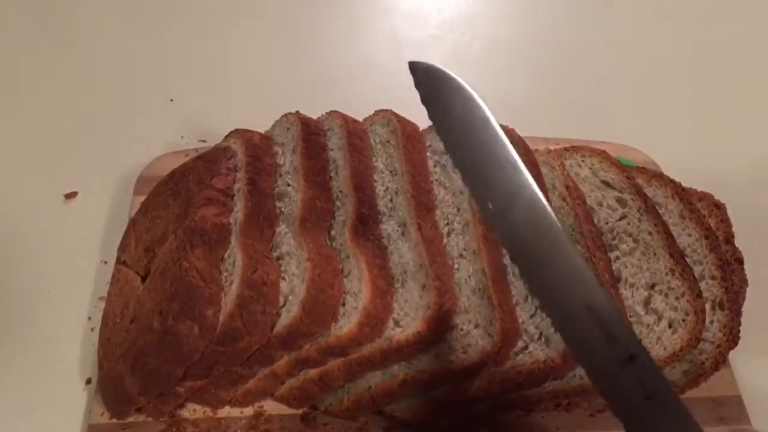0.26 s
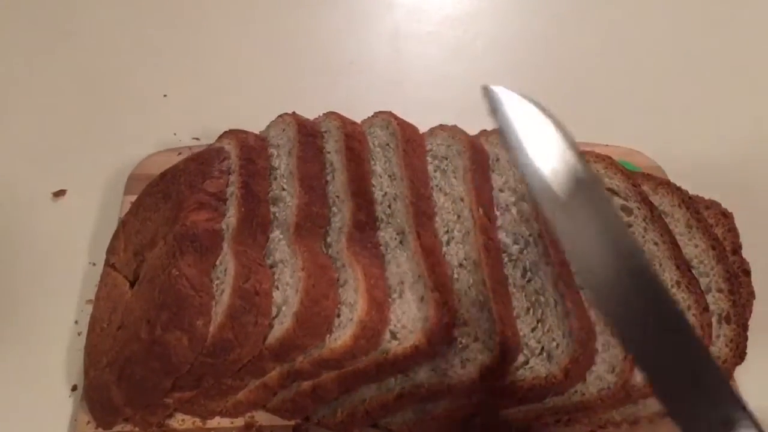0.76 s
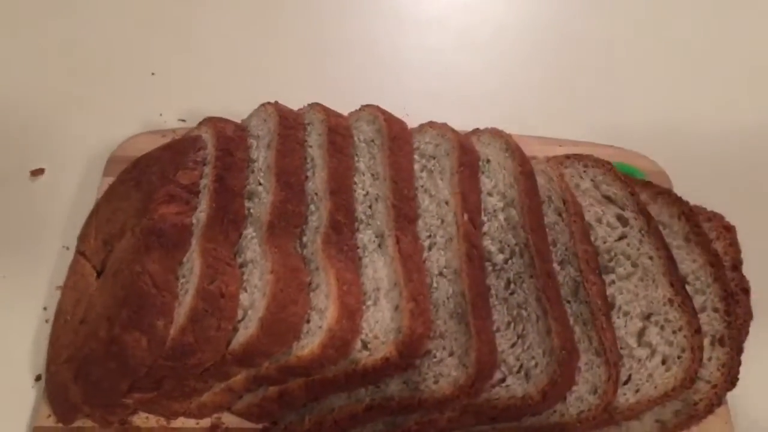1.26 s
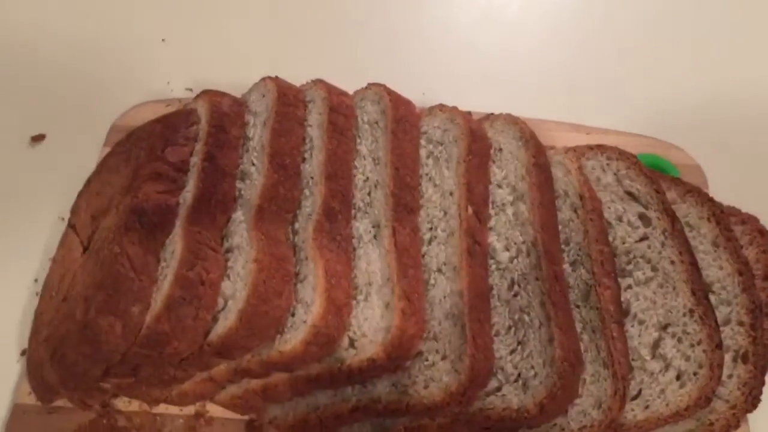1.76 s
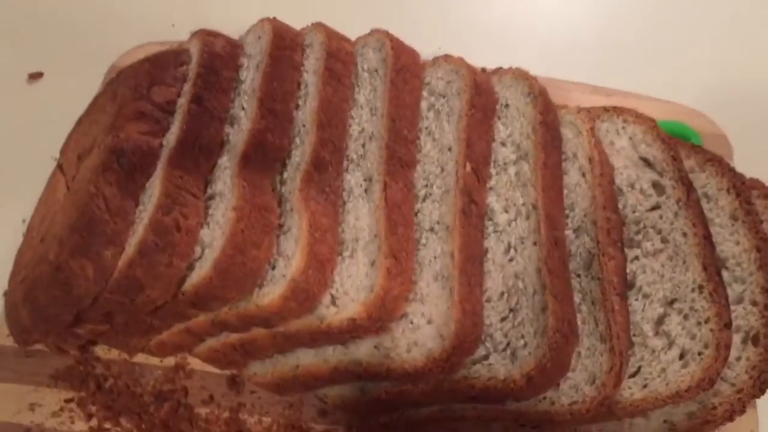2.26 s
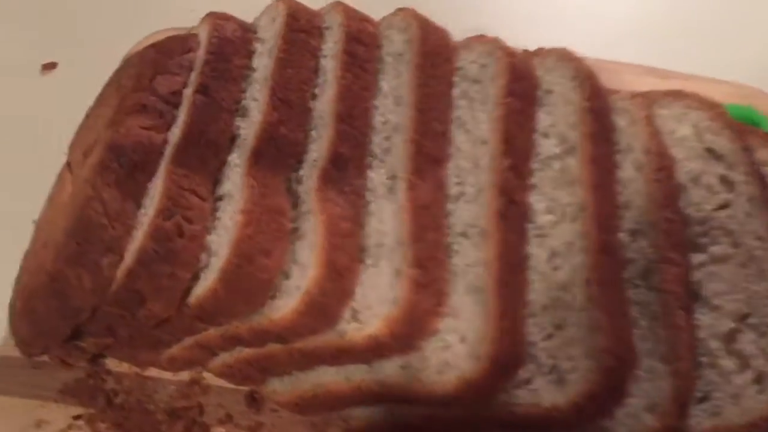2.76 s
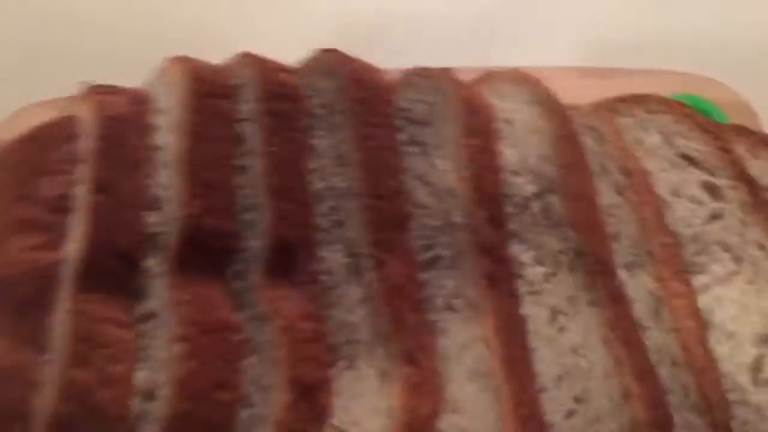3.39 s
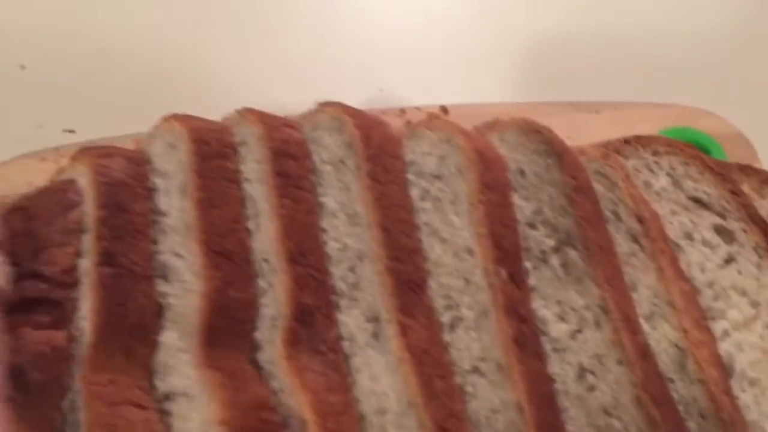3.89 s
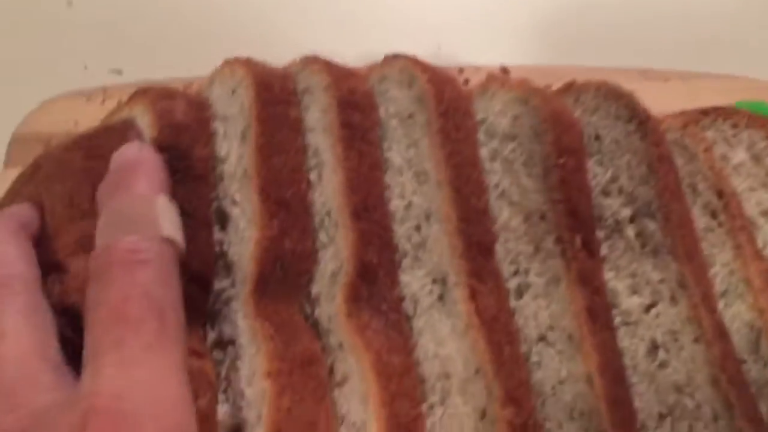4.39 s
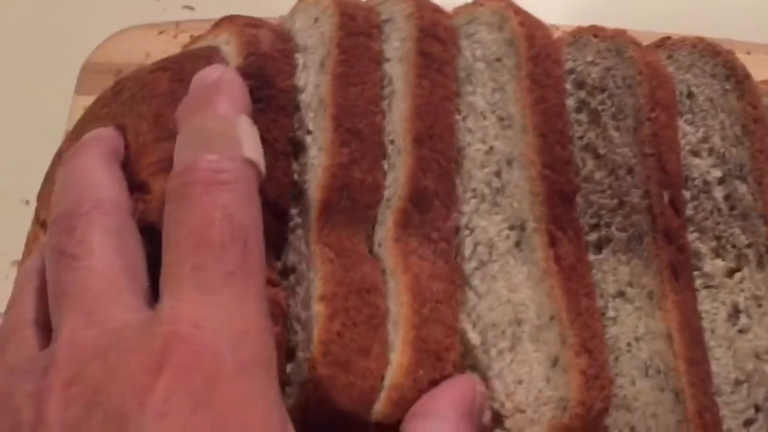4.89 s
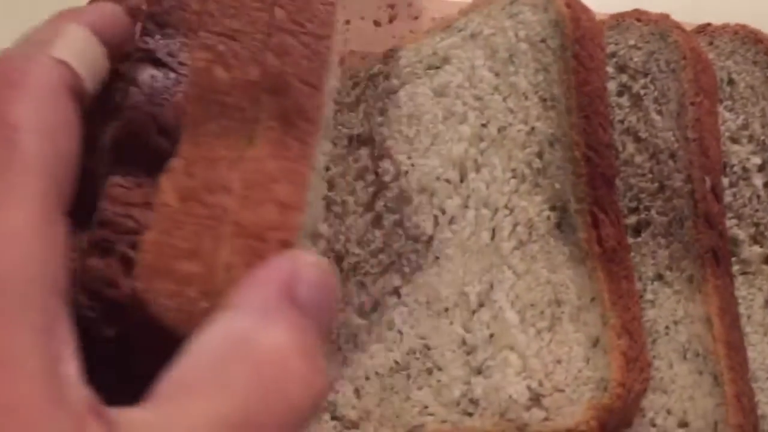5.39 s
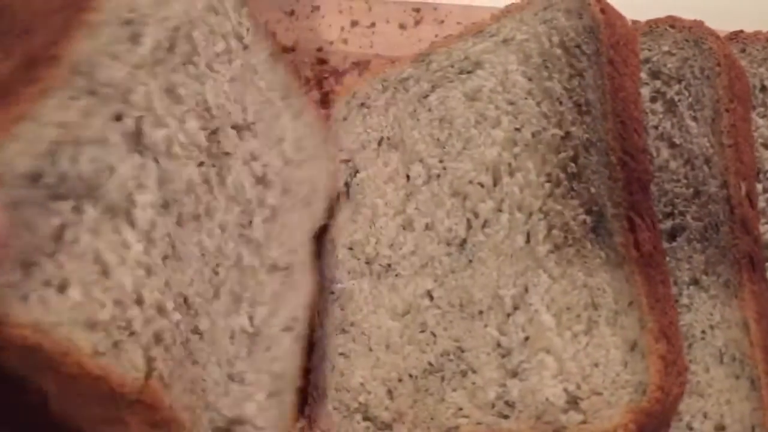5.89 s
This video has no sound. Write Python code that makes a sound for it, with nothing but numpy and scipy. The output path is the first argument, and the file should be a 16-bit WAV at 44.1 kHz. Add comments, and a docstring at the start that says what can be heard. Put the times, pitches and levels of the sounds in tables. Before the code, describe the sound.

In a quiet kitchen, a bread knife is set down with a ringing rattle, followed by faint crackling and rustling of sliced bread.

```python
"""A steel bread knife is laid on a wooden board in a small, quiet kitchen: the blade touches, chatters
and rings, and the handle drops with a thud. Then a hand parts the slices of a crusty loaf: the crust
cracks, crumb rubs on crumb in tiny fractures, and slices bump softly on the board. The hand that holds
the microphone thumps and brushes it now and then, over a low room rumble."""
import sys
import numpy as np
from scipy import signal
from scipy.fft import rfft, irfft
from scipy.io import wavfile

SR = 44100
rng = np.random.default_rng(int(sys.argv[2]) if len(sys.argv) > 2 else 0)


def transcribe(u):
    """Save the signal u as a 16-bit wav file named by the first command-line argument.

    u: samples, shape (n,) or (channels, n), limited to [-1, 1]; the rate is SR.
    q: integer samples, one column per channel.
    """
    v = np.clip(np.atleast_2d(u).T, -1, 1)
    q = np.round(v * 32767).astype(np.int16)
    wavfile.write(sys.argv[1], SR, q)


N = 271038
TIME = np.arange(N) / SR
SHORT = TIME[:int(.4 * SR)]  # time axis of one event


def undb(db):
    """Decibels to gain."""
    return 10 ** (np.asarray(db) / 20)


def unit(x):
    """Scale to unit energy."""
    return x / np.sqrt(np.sum(x ** 2))


def level(x, db):
    """Scale to an rms level."""
    return unit(x) * np.sqrt(len(x)) * undb(db)


def add(out, start_s, x):
    """Mix x into out."""
    i = int(start_s * SR)
    out[i:i + len(x)] += x[:len(out) - i]


def convolve(x, response):
    """Pass x through an impulse response."""
    return signal.oaconvolve(x, response)[:len(x)]


def band(x, hz, kind, order=1):
    """Butterworth filter."""
    sos = signal.butter(order, np.minimum(hz, .49 * SR), kind, fs=SR, output="sos")
    return signal.sosfilt(sos, x + 1e-18)


def colour(x, points, size=8192):
    """Minimum-phase filter through (Hz, dB) points."""
    hz, db = np.transpose(points)
    bins_hz = np.fft.rfftfreq(size, 1 / SR)
    log_gain = np.log(undb(np.interp(np.log(bins_hz + 1), np.log(hz), db)))
    cepstrum = irfft(log_gain)[:size // 2]
    cepstrum[1:] *= 2
    return convolve(x, irfft(np.exp(rfft(cepstrum, size))))


def soften(x, hz):
    """One-pole low-pass: a soft contact pushes for longer."""
    return signal.lfilter([1], [1, -np.exp(-2 * np.pi * hz / SR)], x + 1e-18)


def resonate(x, hz, width_hz):
    """Two-pole resonance."""
    r = np.exp(-np.pi * width_hz / SR)
    return signal.lfilter([1, 0, -1], [1, -(1 + r * r) * np.cos(2 * np.pi * hz / SR), r * r], x + 1e-18)


def fade(t60_s):
    """Exponential decay, 60 dB in t60_s."""
    return np.exp(-np.log(1000) * SHORT / max(t60_s, 1 / SR))


def burst(t60_s, size=2048):
    """Noise that starts at once and dies away."""
    return unit(rng.standard_normal(size) * undb(-60 * SHORT[:size] / t60_s))


# Room noise spectrum. Each row: frequency in Hz, relative density in dB.
AIR_SPECTRUM = [(15, -64), (25, -12), (49, -4.5), (130, 0), (190, -2), (206, -8), (270, -7.5),
                (293, -11.5), (326, -6), (384, -14.5), (734, -23), (1940, -24.5), (2410, -26),
                (4200, -28.5), (4900, -31.5), (5800, -30.5), (9300, -33.5), (10500, -37.5),
                (11800, -34), (16000, -39)]
def air():
    """Low steady room rumble under a faint hiss."""
    return level(colour(rng.standard_normal(N), AIR_SPECTRUM), db=-62)


# Grip thumps. Each row: start in seconds, peak in dB, mid pitch in Hz, length in seconds.
THUMPS = [(0.155, -36.5, 117, 0.013), (0.785, -39.5, 99, 0.016), (1.66, -49, 142, 0.042),
          (2.917, -46.5, 75.5, 0.042), (3.283, -45, 55, 0.052), (3.367, -42, 107, 0.011),
          (3.96, -49, 146, 0.038)]
def grip_thumps():
    """A shift of grip flexes the microphone housing for a few cycles that sink in pitch."""
    out = np.zeros(N)
    for start_s, db, hz, length_s in THUMPS:
        swell = np.hanning(int(length_s * SR))
        pitch_hz = hz * np.linspace(1.4, .6, len(swell))
        add(out, start_s, undb(db) * swell * np.sin(2 * np.pi * np.cumsum(pitch_hz) / SR))
    return out


def ring(modes, count, scatter_db):
    """One ring of the modes for each of count blows; every contact point weights them differently."""
    waves = np.array([undb(db) * unit(np.sin(2 * np.pi * hz * SHORT) * fade(t60_s))
                      for hz, db, t60_s in modes])
    size, side = rng.standard_normal((count, len(modes), 2)).T
    weights = np.sign(side) * undb(scatter_db * size)
    return [unit(wave) for wave in weights.T @ waves]


def rattle(chatter_s, bounces_db):
    """One contact: a first touch, then micro-bounces that die out over chatter_s."""
    bounces = rng.standard_normal(4096) * np.exp(-SHORT[:4096] / chatter_s)
    drive = undb(bounces_db) * unit(bounces)
    drive[0] += 1
    return drive


def clack(drive, spectrum, t60_s):
    """A contact makes a short, noisy clack in the colour of steel or wood."""
    response = burst(t60_s, size=4096)
    response[0] += undb(-3.5)
    return unit(signal.fftconvolve(drive, colour(response, spectrum)))


# Blade modes. Each row: frequency in Hz, level in dB on edge, tipping and flat, t60 in seconds.
BLADE_MODES = [(199, -4, -20, -20, .14), (500, -8, -16, -16, .08), (860, -6, -3, -9, .08),
               (975, -10, -4, -10, .04), (1230, 0, -6, -6, .04), (1400, -5, -6, -6, .04),
               (1583, -3, -9, -8, .17), (1720, -2, -8, -6, .04), (1795, -6, -1, -5, .05),
               (2130, -10, 0, -8, .08), (2310, 1, 1, -5, .035), (2930, -15, -5, -5, .06),
               (3095, -16, -1, -1.5, .16), (3228, -2, -7, -7, .15), (3494, 0, -5, -5, .025),
               (3666, -6, -6, -6, .04), (4091, -3, 0, -5, .26), (4253, -8, -10, -14, .05),
               (4387, -2, -12, -2, .17), (4506, -11, 3, -1, .12), (5105, -1, -14, -5, .09),
               (5370, -11, -7, 0, .09), (5625, -8, -3, -9, .07), (5792, -9, -7, -2, .16),
               (5916, -13, -16, 0, .06), (6490, -8, -11, -7, .07), (6570, -2, -8, -6, .035),
               (6975, -10, -3, -7, .1), (7750, -7, -2, 1, .03), (8310, -7, -15, -7, .2),
               (8710, -10, -6, -3, .06), (9776, -7, -11, -12, .05), (11890, -9, -8, -6, .05),
               (13130, -9, -7, -1, .08), (13627, -4, -2, -6, .6), (14730, -14, -6, -1, .05),
               (15668, -6, -11, -9, .25)]
# Clear and deep board modes. Each row: frequency in Hz, level in dB, t60 in seconds.
BOARD_MODES = [(142, -15, .2), (199, -5, .2), (245, -7, .18), (308, -3, .18), (366, -3, .18),
               (528, -7, .13), (602, -6, .15), (852, 1, .17), (972, -2, .13), (1087, -1, .11),
               (1217, -2, .11), (1405, 0, .14), (1456, 1, .14), (2106, -2, .1)]
DEEP_BOARD_MODES = [(76, -4, 0.13), (111, -12, 0.17), (138.5, 6, 0.15), (185.3, 3.5, 0.25),
                    (286.5, -5.5, 0.087), (408, -7.5, 0.077), (607, 0.5, 0.027), (840, -11.5, 0.033)]
# Clack spectra of blade and board. Each row: frequency in Hz, relative density in dB.
STEEL_SPECTRUM = [(150, -20), (700, -9), (1500, -2), (2000, -9), (2300, 0), (2600, -6), (3000, 1),
                  (3500, 0), (4500, -1), (4850, -8), (5600, -1), (6800, -2), (7350, -13), (7800, -4),
                  (10500, -8), (13000, -5), (16000, -8)]
WOOD_SPECTRUM = [(50, -42), (120, -16), (200, -8), (310, -2), (410, -1.5), (520, -6), (620, -7), (850, -3),
                 (1450, -2), (1950, -12), (2200, -5), (2700, -15), (6000, -24), (16000, -36)]
# Knife contacts. Each row: start in seconds, blade and board energy in dB, chatter in seconds,
# blade and board low-pass in Hz.
BLOWS = [(1.991, -8.5, -19, 0.00075, 14000, 1000), (1.997, -5.5, -18.5, 0.0017, 12000, 400),
         (2.0323, -11.5, -28, 0.0041, 5500, 2000), (2.0577, -17, -28, .003, 4040, 2000),
         (2.0649, -13, -26, 0.0036, 3000, 1200), (2.0805, -11.5, -17.5, 0.0023, 5000, 2500),
         (2.0913, -10.5, -21, 0.0064, 3500, 4000), (2.1088, -22, -5, .0021, 1500, 1800),
         (2.1126, -11, -1, 0.0023, 3000, 4000), (2.127, -9.5, -12, .0044, 6000, 2000),
         (2.1381, -10.5, -6, 0.0026, 5000, 4000), (2.145, -8, -10, 0.0014, 7960, 4000),
         (2.163, -9.5, -13, .017, 4000, 2500), (2.1897, -7, -4, 0.0017, 12000, 5000),
         (2.194, -6.5, -4.5, 0.0015, 12000, 2000), (2.202, -20, -7.5, .003, 3000, 600),
         (2.2109, -5.5, -6.5, 0.0016, 8000, 900), (2.2172, -15, -9.5, .003, 12000, 1000),
         (2.238, -14, -12, 0.0014, 16000, 2000), (2.2466, -8, -11, 0.0019, 16000, 900),
         (2.255, -10, -14.5, 0.0014, 14000, 2000), (2.263, -16, -13, .002, 8000, 1500)]
def knife():
    """Each contact rings blade and board; the blade's pose weights its modes, and lying flat damps it."""
    tip_s, flat_s, choke_db_per_s = 2.075, 2.185, 235
    knock_db, deep_db = -5.5, -19.5  # relative to the board's clack
    out = np.zeros(N)
    blade, count = np.array(BLADE_MODES), len(BLOWS)
    edge, tipping, flat = [ring(blade[:, [0, pose, -1]], count, scatter_db=1.5) for pose in (1, 2, 3)]
    knocks = ring(BOARD_MODES, count, scatter_db=4)
    deeps = ring(DEEP_BOARD_MODES, count, scatter_db=6)
    for i, (start_s, blade_db, board_db, chatter_s, blade_hz, board_hz) in enumerate(BLOWS):
        drive = rattle(chatter_s, bounces_db=12)
        build = 1 - np.exp(-2 * SHORT / chatter_s)  # the ring grows while the contact lasts
        choke = undb(-choke_db_per_s * np.maximum(start_s + SHORT - max(start_s, flat_s), 0))
        clinks = edge if start_s < tip_s else tipping if start_s < flat_s else flat
        clack_db = -3 if start_s < flat_s else -1
        steel = unit(clinks[i] * build * choke)
        add(steel, 0, undb(clack_db) * clack(drive, STEEL_SPECTRUM, t60_s=0.021))
        wood = build * (undb(knock_db) * knocks[i] + undb(deep_db) * band(deeps[i], 140, "high", order=3))
        add(wood, 0, clack(drive, WOOD_SPECTRUM, t60_s=0.045))
        add(out, start_s, undb(blade_db) * unit(soften(steel, blade_hz)))
        add(out, start_s, undb(board_db) * unit(soften(wood, board_hz)))
    return out


def thud(hz, rise_s, t60_s):
    """A blunt push on the board swells and dies; its pitch sinks as the contact relaxes."""
    sharp_share, relax_s = .25, 0.013
    swell = (1 - np.exp(-SHORT / rise_s)) ** 2 * fade(t60_s)
    pitch_hz = hz * (1 + sharp_share * np.exp(-SHORT / relax_s))
    return swell / swell.max() * np.sin(2 * np.pi * np.cumsum(pitch_hz) / SR)


# Handle thuds. Each row: start in seconds, peak in dB, final pitch in Hz, rise and t60 in seconds.
HANDLE_THUDS = [(2.1096, -27, 290, 0.0011, 0.057), (2.1915, -28.5, 268, .005, 0.046),
                (2.2052, -34.5, 176.5, 0.0017, 0.1), (2.2447, -37.5, 205, 0.0036, 0.049)]
def handle():
    """The heavy handle drops on the board and gives the main blows a wooden body."""
    out = np.zeros(N)
    for start_s, db, hz, rise_s, t60_s in HANDLE_THUDS:
        add(out, start_s, undb(db) * thud(hz, rise_s, t60_s))
    return out


def grains(per_s, spread_db, size):
    """Tiny impulses at random moments, most weak and a few strong."""
    when, sign, strength = rng.random((size, 3)).T
    gains = undb(spread_db * np.minimum(-np.log(1 - strength), 3.5))
    return (when < per_s / SR) * np.sign(sign - .5) * gains


# Skin on the microphone housing; fingers and slices on the crust.
# Each row: start and length in seconds, rms at the swell's top in dB, centre in Hz.
HOUSING_BRUSHES = [(3.288, 0.049, -57, 1170), (3.312, 0.074, -61, 4400), (3.345, 0.042, -56.5, 655),
                   (3.29, 0.09, -62.5, 290)]
CRUST_STROKES = [(3.9, 0.15, -77, 11000), (3.995, 0.031, -64.5, 3750), (4.14, .05, -74, 5060),
                 (4.262, 0.035, -70.5, 8950), (4.31, .13, -71.5, 6000), (4.54, 0.1, -72.5, 3900),
                 (5.938, 0.032, -57, 2720)]
def strokes(table, grains_per_s, spread_db):
    """Sliding over a rough surface makes a short swell of fine friction grains."""
    out = np.zeros(N)
    for start_s, length_s, db, hz in table:
        swell = np.hanning(int(length_s * SR)) ** 0.4
        friction = grains(grains_per_s, spread_db, size=len(SHORT))[:len(swell)]
        width_hz = hz * np.clip(hz / 2500, .3, .9)  # low rasps are hollower
        add(out, start_s, level(resonate(friction, hz, width_hz), db) * swell)
    return out


# Crust snaps. Each row: start in seconds, flake energy in dB and pitch in Hz,
# tick energy in dB and pitch in Hz.
SNAPS = [(3.589, -31, 2280, -43, 4220), (4.2173, -42, 4320, -43, 7000), (4.2667, -38, 4030, -40.5, 9100),
         (4.8864, -43, 2340, -45, 8000), (4.923, -32.5, 2060, -41, 6500), (4.948, -34, 553, -40, 4500),
         (4.9563, -27.5, 675, -29.5, 4440), (4.969, -28.5, 1760, -37, 4000), (5.022, -52, 2660, -39, 8000),
         (5.0373, -38, 4500, -30, 6340), (5.1357, -30.5, 1700, -29.5, 7200), (5.155, -38, 2200, -32, 7000),
         (5.1636, -28, 700, -31, 3500), (5.1903, -28, 1700, -28, 6700), (5.2015, -30, 620, -31, 3000),
         (5.226, -32.5, 2100, -43, 6000), (5.2632, -33, 1760, -35, 8000), (5.277, -40, 560, -39, 5000),
         (5.2808, -30, 1730, -45, 6000), (5.32, -33, 1510, -28.5, 8600), (5.346, -24, 1200, -33, 2580),
         (5.349, -28, 477, -42, 3000), (5.385, -32, 2000, -44, 8000), (5.397, -34.5, 1700, -36, 8500),
         (5.428, -28.5, 1146, -27, 6700), (5.446, -38, 1530, -33, 10500), (5.4874, -28.5, 1550, -52, 6000),
         (5.569, -25.5, 1810, -30, 5400), (5.602, -27.5, 700, -39, 3040), (5.638, -27, 1400, -38, 3400),
         (5.647, -27.5, 476, -40, 2800), (5.7262, -31, 1420, -29.5, 6450), (5.7758, -25, 1390, -32.5, 5500),
         (5.85, -29, 5800, -37.5, 8500), (5.865, -32, 5900, -35, 9000), (5.946, -19, 1680, -32, 4000),
         (5.979, -20, 1980, -25, 6000), (6.045, -28, 1500, -29.5, 4100)]
def crust_snaps():
    """A flake of crust cracks open with a tick, rings for a few cycles and crumbles."""
    rise_s, split_hz, split_db = 0.00034, 13000, -4.5
    flake_width, tick_width = 0.42, 0.51  # bandwidth over pitch
    out = np.zeros(N)
    for start_s, flake_db, flake_hz, tick_db, tick_hz in SNAPS:
        flake = burst(0.0058) + undb(-4) * burst(0.043)
        opening = 1 - np.exp(-SHORT[:len(flake)] / rise_s)
        flake = resonate(flake * opening, flake_hz, flake_width * flake_hz)
        flake = resonate(flake, flake_hz, flake_width * flake_hz)
        tick = burst(0.0064) + undb(-9.5) * burst(0.11)
        tick = resonate(tick * opening, tick_hz, tick_width * tick_hz)
        split = band(burst(0.0039), split_hz, "high", order=2)  # the instant of fracture
        tick = unit(tick) + undb(split_db) * unit(split)
        add(out, start_s, undb(flake_db) * unit(flake) + undb(tick_db) * unit(tick))
    return out


# Slices tipping against the board. Each row: start in seconds, thud peak in dB, final pitch in Hz,
# rise and t60 in seconds.
BUMPS = [(4.151, -51.5, 140, 0.0055, 0.074), (4.957, -50, 153, 0.0033, .08), (5.128, -52, 125, 0.0046, .1),
         (5.161, -46, 123, .005, .06), (5.192, -44.5, 150, .005, .14), (5.27, -50, 146, 0.0076, 0.23),
         (5.312, -54.5, 159, 0.0068, 0.14), (5.383, -48, 125, .005, .07), (5.42, -52.5, 155, .004, 0.14),
         (5.589, -43.5, 108, 0.003, 0.12), (5.611, -51.5, 220, 0.0026, 0.066),
         (5.629, -47.5, 135.6, .01, .11), (5.641, -42.5, 240, 0.0062, 0.032),
         (5.753, -49, 110, 0.013, 0.17), (5.818, -47, 126, 0.0042, 0.061),
         (5.857, -44.5, 143.4, .005, 0.13), (5.893, -46, 150, .004, 0.072), (5.962, -41.5, 68, 0.007, 0.05),
         (6.046, -42.5, 140, .004, 0.068), (6.069, -47.5, 155, 0.0037, 0.08), (6.093, -47, 129, .005, .15)]
def slice_bumps():
    """Soft bread lands with a dull thud, pitched by the slice's size; the board's deep modes answer."""
    out = np.zeros(N)
    rings = ring(DEEP_BOARD_MODES, len(BUMPS), scatter_db=5.5)
    for (start_s, db, hz, rise_s, t60_s), board in zip(BUMPS, rings):
        push = undb(db) * thud(hz, rise_s, t60_s)
        answer = unit(board * (1 - np.exp(-SHORT / rise_s))) * np.linalg.norm(push)
        add(out, start_s, push + undb(-5) * answer)
    return out


# Slice sliding on slice. Each row: time of top speed, rise and fall in seconds, level in dB,
# relative treble in dB.
SLIDES = [(4.967, 0.023, 0.0073, -52.5, -12), (5.202, 0.027, 0.019, -53.5, -4),
          (5.279, 0.009, 0.0065, -54.5, -2), (5.346, 0.018, 0.012, -53.5, -23),
          (5.39, 0.011, 0.019, -59.5, -7), (5.44, 0.011, 0.032, -56, -9), (5.592, 0.012, 0.0086, -54, -29),
          (5.646, 0.0098, 0.0096, -49, -33), (5.787, 0.026, 0.028, -54, -11),
          (5.904, 0.03, 0.039, -44.5, -15), (5.947, 0.019, 0.041, -39.5, -12),
          (6.03, 0.068, 0.032, -45, -22), (6.125, 0.073, 0.047, -46.5, -19)]
def slide_envelopes():
    """Each slide gathers speed and dies away; returns the gains of the rub and of its crisp treble."""
    hold_s, hold_db = 4.9, -74.5  # once held, the loaf crackles faintly
    rub_power = treble_power = (TIME > hold_s) * undb(hold_db) ** 2
    for peak_s, rise_s, fall_s, db, treble_db in SLIDES:
        decay = np.maximum((peak_s - TIME) / rise_s, (TIME - peak_s) / fall_s)
        power = (undb(db) * np.exp(-np.minimum(decay, 20))) ** 2
        rub_power = rub_power + power
        treble_power = treble_power + power * undb(treble_db) ** 2
    return np.sqrt(rub_power), np.sqrt(treble_power)


# Crumb spectrum. Each row: frequency in Hz, relative density in dB.
CRUMB_SPECTRUM = [(200, -18), (400, -7), (650, -4), (1050, 1.5), (1600, 4), (2400, -2.5), (3200, 0),
                  (4700, -8), (6300, 0), (9000, -3), (12500, -7), (16000, -8)]
def crumb_rubbing():
    """Slices peel apart in sparse crackles; faster sliding packs them into a rasp and drums the board."""
    unit_speed_db, crumble_s, echo_s = -57, .00015, 0.001
    rasp_hz, rasp_db = 2450, -47.5  # the band above rasp_hz opens as the rub nears rasp_db
    rub, treble = slide_envelopes()
    speed = rub / undb(unit_speed_db)
    grains_per_s = np.clip(1100 * speed ** 1.2, 200, 8000)
    impulses = grains(grains_per_s, spread_db=2, size=N) / np.sqrt(grains_per_s)
    crumbling = convolve(impulses ** 2, np.exp(-SHORT / crumble_s))
    fractures = np.sqrt(np.abs(crumbling)) * rng.standard_normal(N)
    echo = np.roll(fractures, int(echo_s * SR))  # the board's reflection hollows the rasp
    crumb = colour(fractures + undb(-12) * echo, CRUMB_SPECTRUM)
    body = band(crumb, 4600, "low", order=3)
    body = band(body, rasp_hz, "low") + np.tanh(rub / undb(rasp_db)) * band(body, rasp_hz, "high")
    crisp = band(crumb, 9200, "high", order=3)
    board = ring(DEEP_BOARD_MODES, count=1, scatter_db=-0.5)[0]
    damped_board = unit(board * fade(t60_s=0.068))  # under the loaf
    drum = convolve(level(fractures, db=-57) * np.tanh(speed), damped_board)
    return rub * level(body, db=-0.23) + treble * level(crisp, db=0.5) + drum


# Room decay. Each row: frequency in Hz, t60 in seconds.
ROOM_T60 = [(100, 0.67), (300, 0.35), (1500, 0.35), (5000, 0.24), (14000, 0.17)]
def kitchen(first_wall_s):
    """Hard nearby walls return a short diffuse tail whose treble dies first."""
    hz, t60_s = np.transpose(ROOM_T60)
    tail = 0
    for low_hz in 45 * 2 ** np.arange(9):
        octave = band(rng.standard_normal(len(SHORT)), [low_hz, 2 * low_hz], "band", order=3)
        centre_hz = low_hz * np.sqrt(2)
        tail = tail + octave * fade(np.interp(np.log(centre_hz), np.log(hz), t60_s))
    onset = np.minimum(SHORT / first_wall_s, 1) ** 2
    return unit(colour(tail * onset, [(100, 2.5), (400, 0.5), (1500, 0.5), (5000, -1), (15000, -0.5)]))


def scene():
    """Mono mix; the knife lies further off than the bread and so carries more of the room."""
    clatter = knife() + handle()
    bread = crust_snaps() + crumb_rubbing()
    bread += strokes(CRUST_STROKES, grains_per_s=2500, spread_db=4.5) + slice_bumps()
    grip = grip_thumps() + strokes(HOUSING_BRUSHES, grains_per_s=12000, spread_db=2)
    room = convolve(undb(-10.5) * clatter + undb(-13.5) * bread, kitchen(first_wall_s=0.016))
    return (clatter + bread + room + grip + air())[None]


def record(dry):
    """Cut the deepest rumble and the extreme treble."""
    low_hz, top_hz = 54.6, 16000
    thinned = band(dry, low_hz, "high", order=2)
    return signal.sosfilt(signal.ellip(10, .2, 70, top_hz, fs=SR, output="sos"), thinned)


dry = scene()
out = record(dry)
transcribe(out)
```